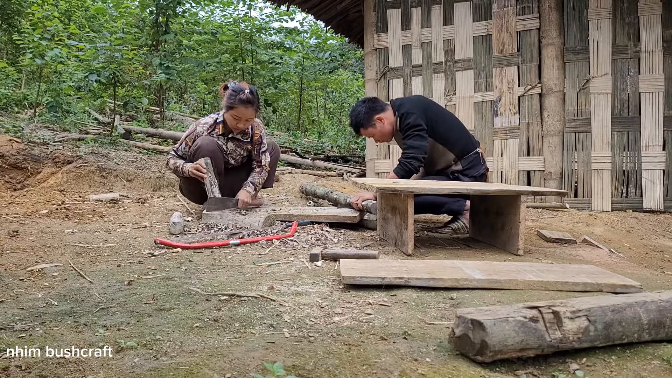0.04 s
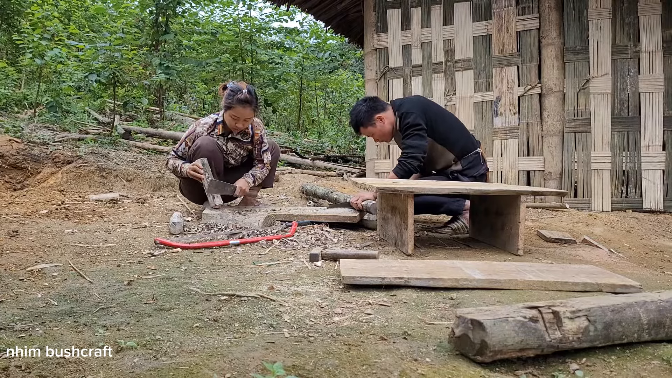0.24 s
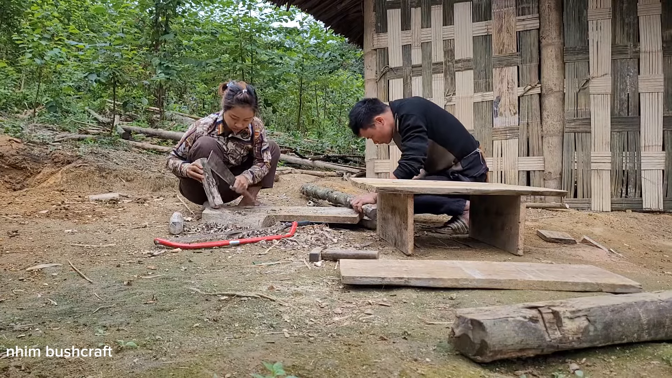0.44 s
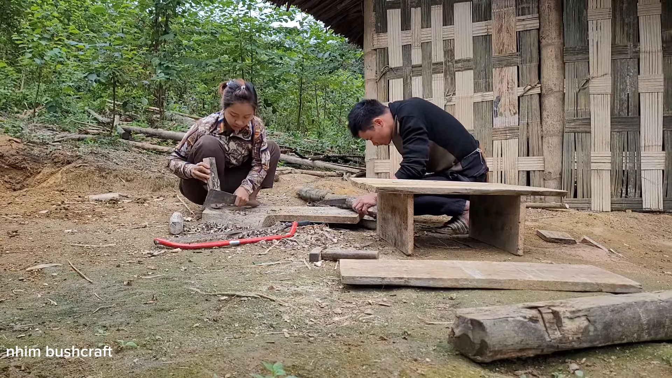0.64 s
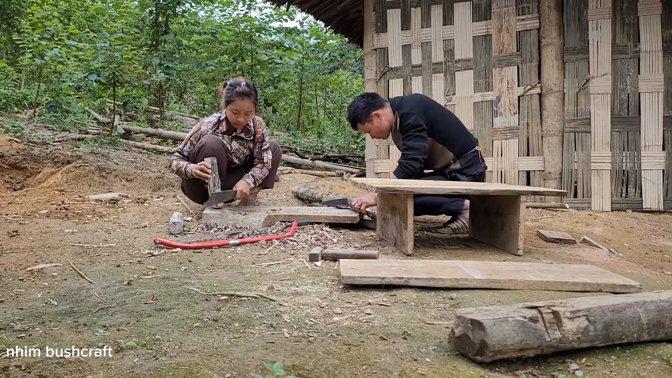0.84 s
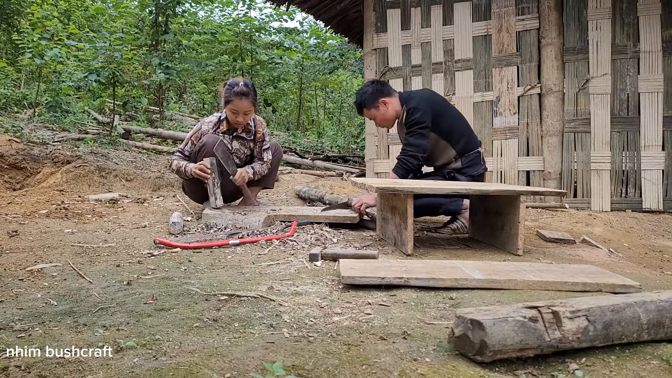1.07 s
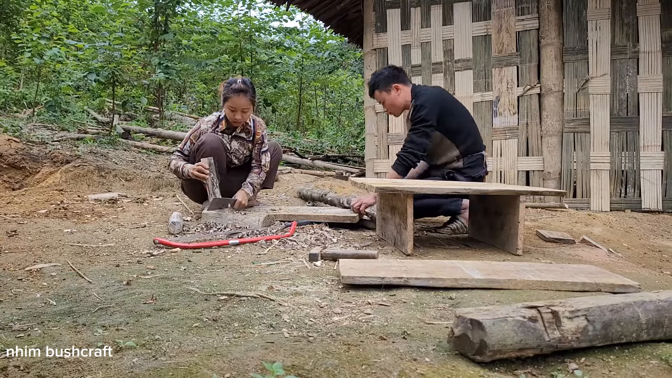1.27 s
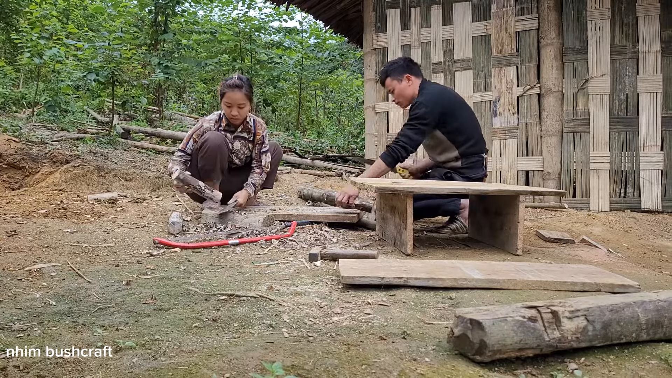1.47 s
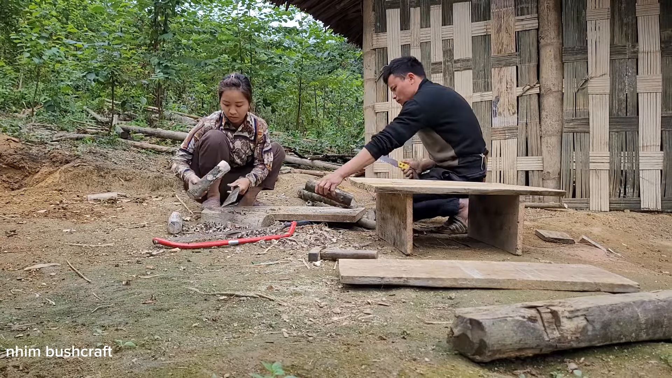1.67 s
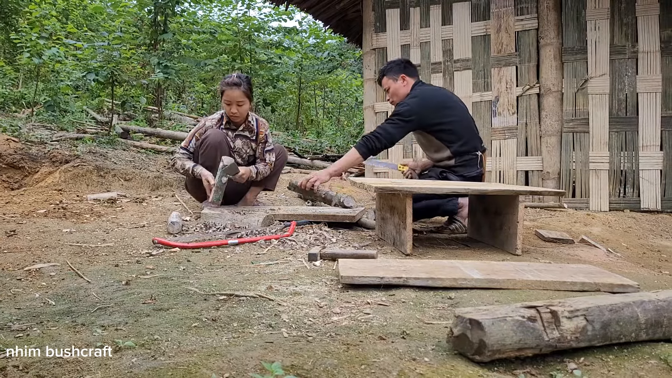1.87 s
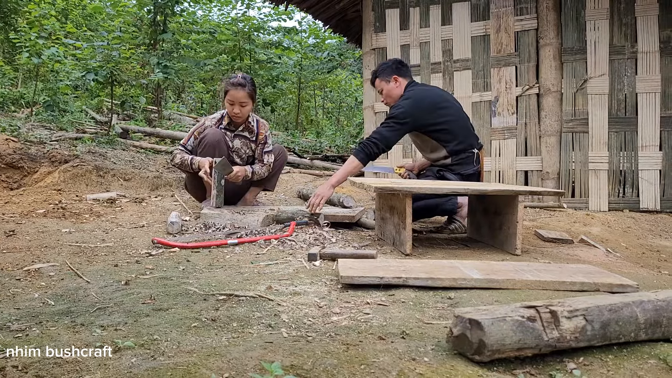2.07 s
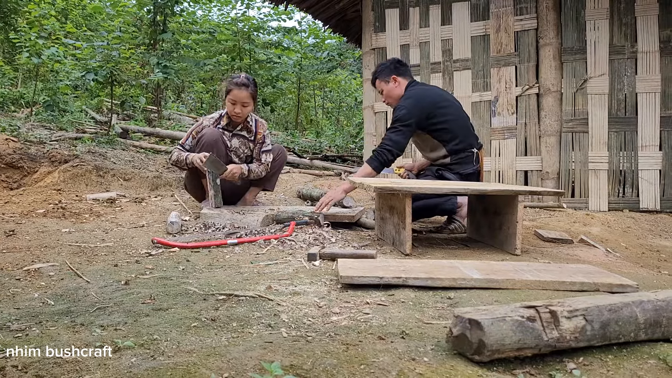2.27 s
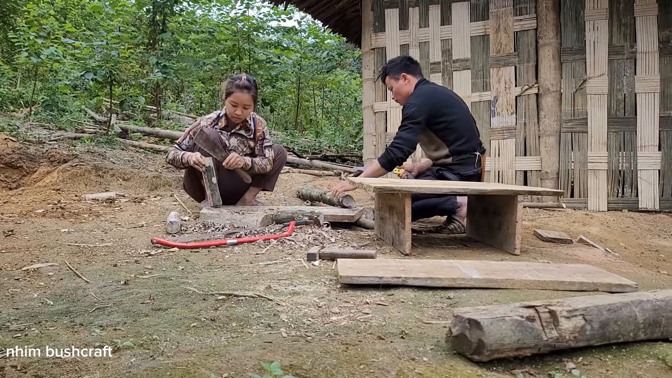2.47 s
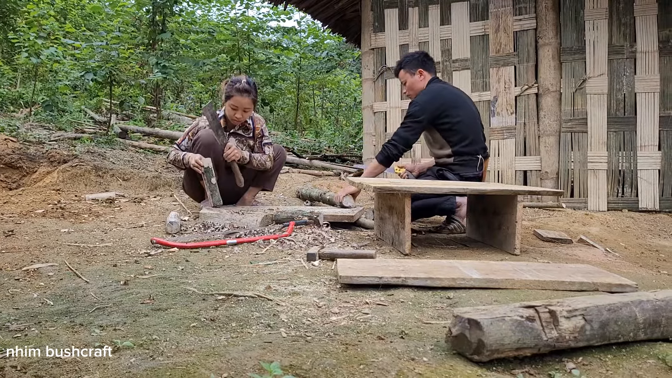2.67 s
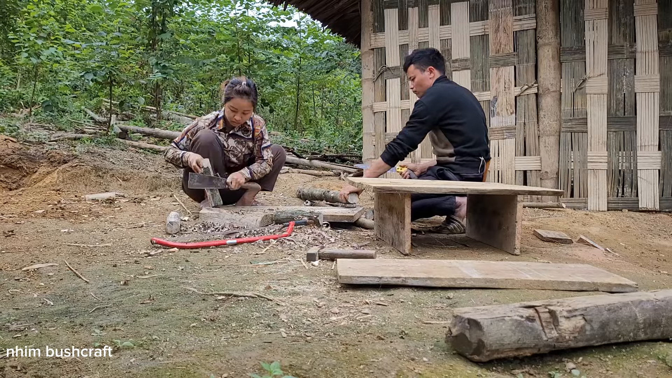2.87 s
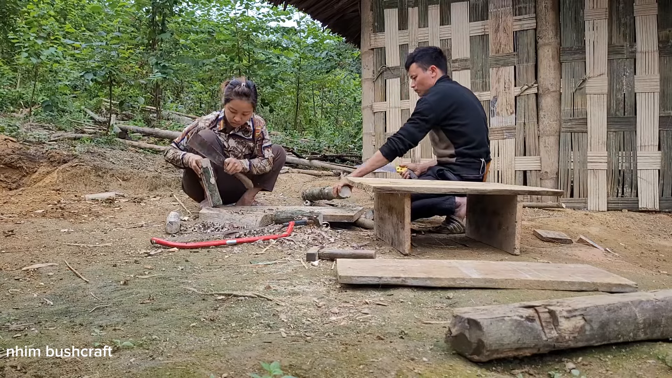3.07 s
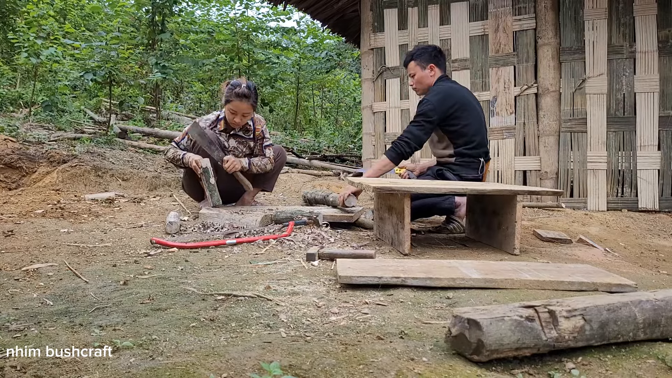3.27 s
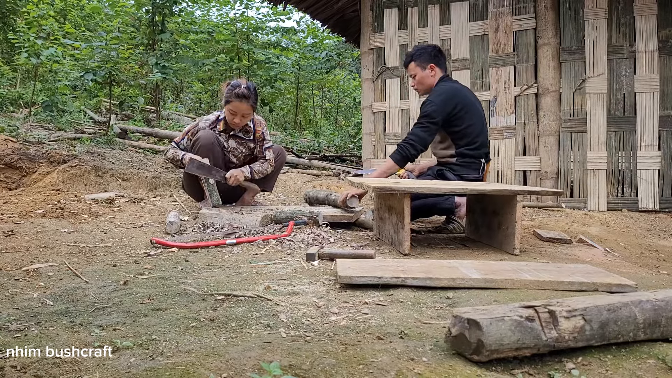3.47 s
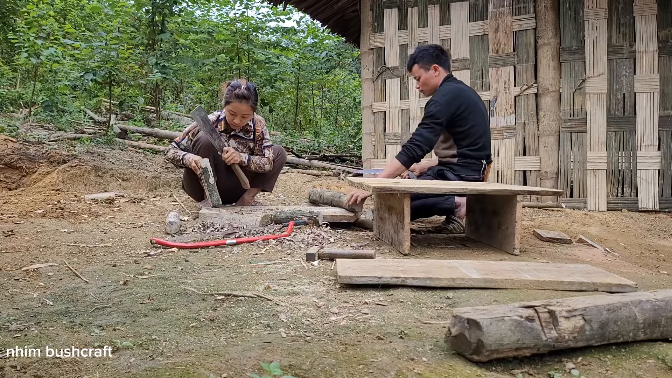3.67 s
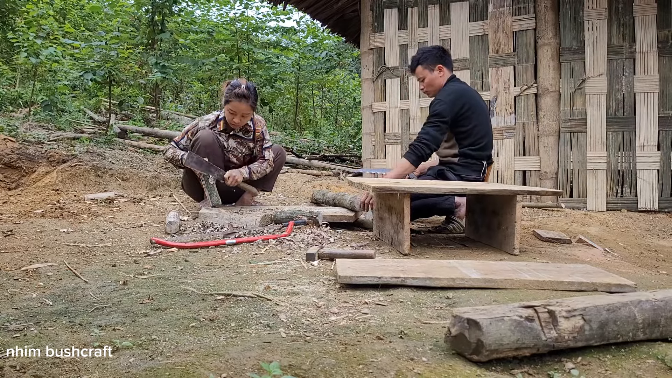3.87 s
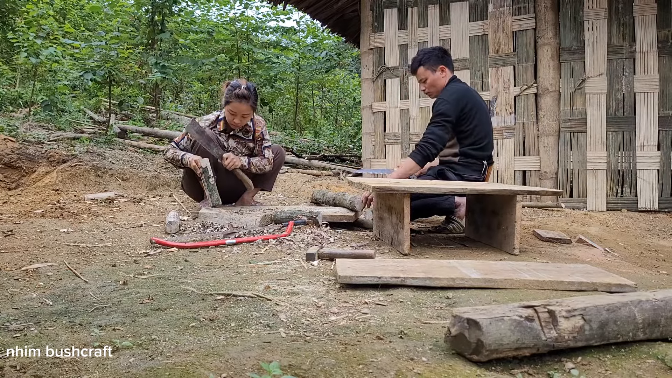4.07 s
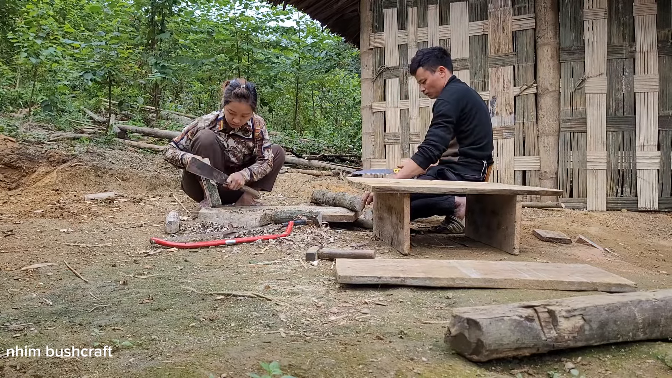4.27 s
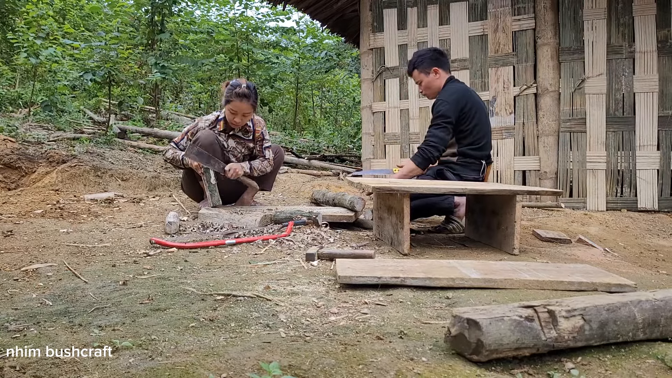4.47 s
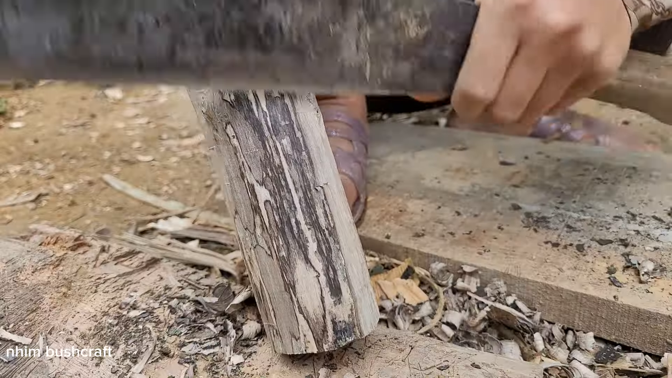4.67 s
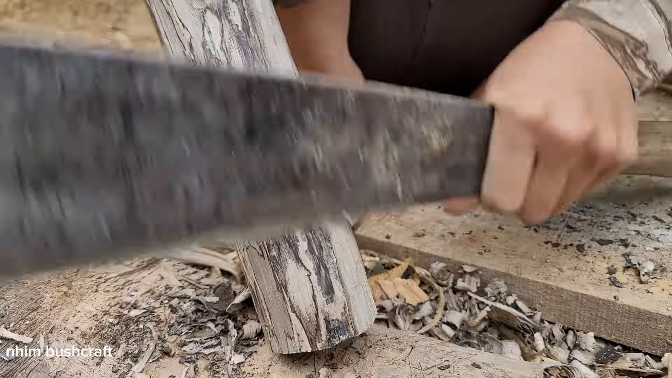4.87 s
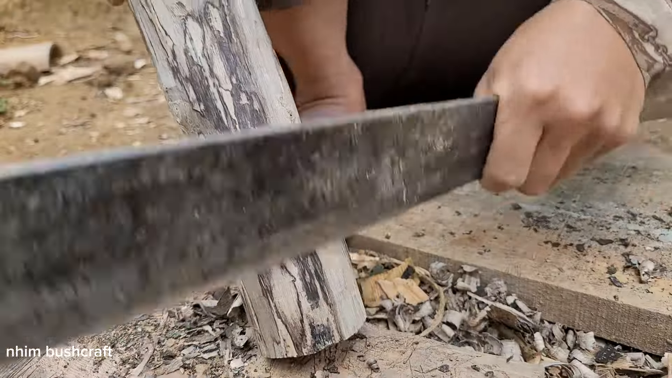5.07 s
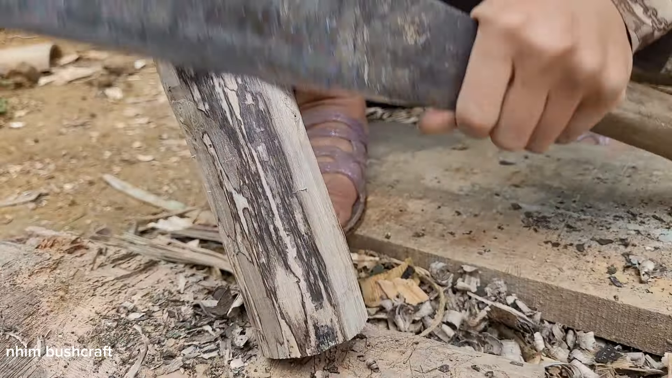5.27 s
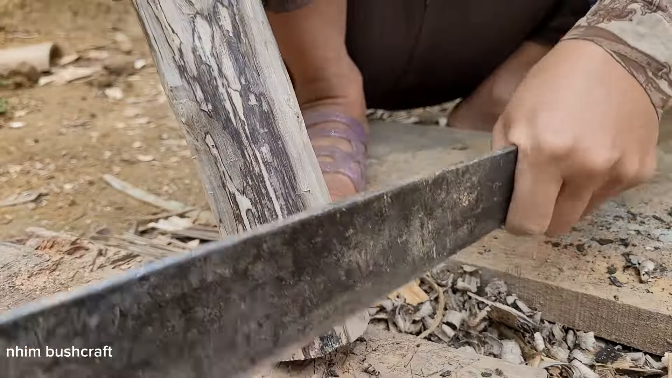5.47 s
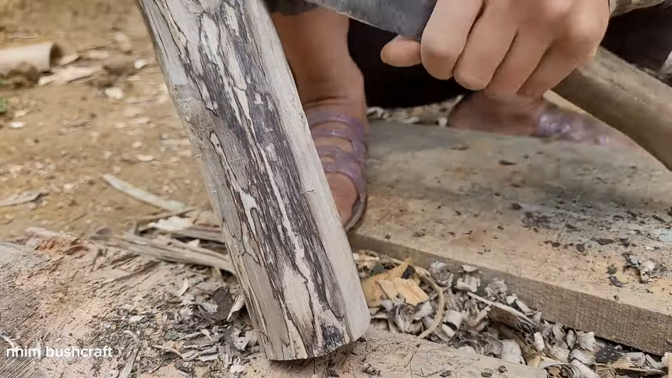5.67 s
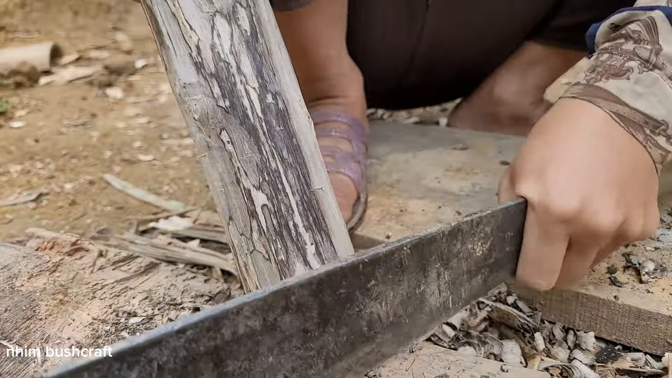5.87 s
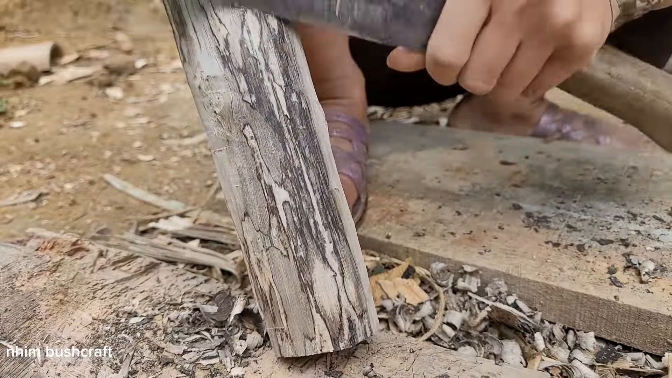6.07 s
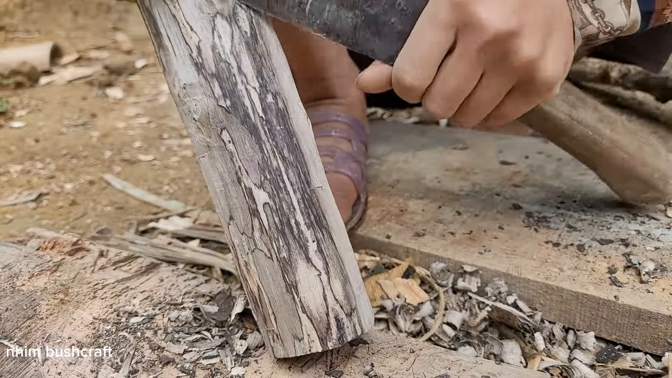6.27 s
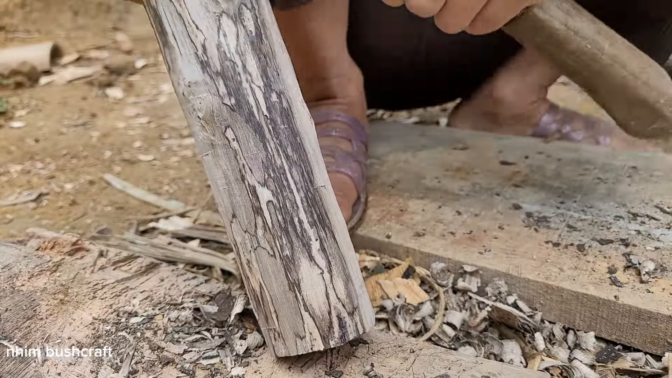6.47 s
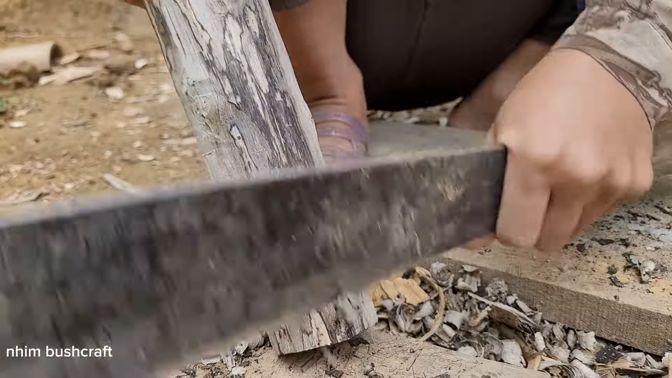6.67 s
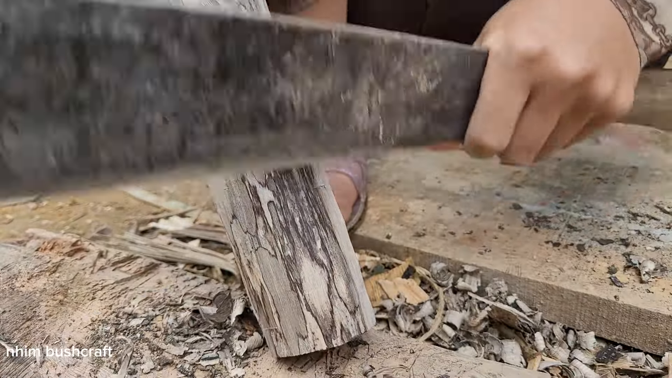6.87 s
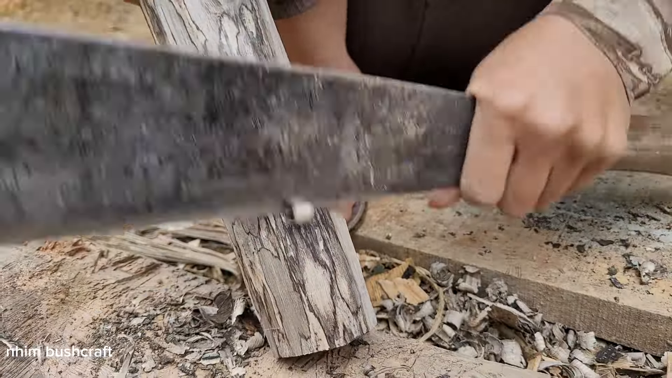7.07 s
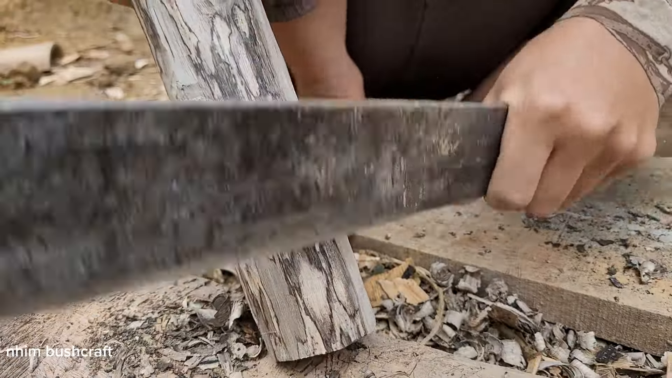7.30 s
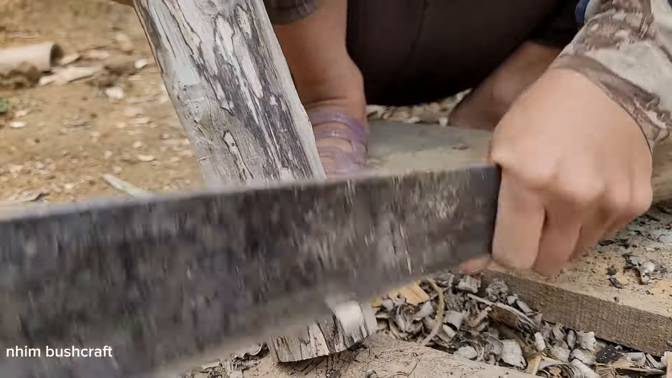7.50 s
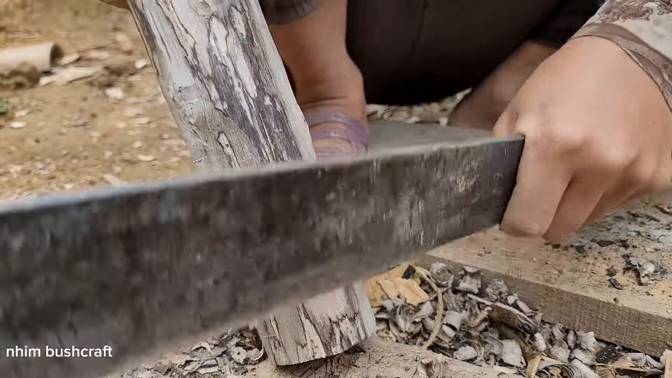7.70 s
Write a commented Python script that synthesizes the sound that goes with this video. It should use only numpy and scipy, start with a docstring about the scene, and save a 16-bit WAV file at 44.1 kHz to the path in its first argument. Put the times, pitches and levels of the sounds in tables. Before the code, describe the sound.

In a quiet leafy yard, heard from a few metres, a machete chops a stick on a block beside a short burst of hand sawing. The saw stops and lighter, scattered slicing strokes follow. After a tiny gap of silence the microphone is right by the blade: steady, loud blows with torn wood, steel hiss, hard knocks and low thuds, with sawing resumed alongside.

```python
"""Outdoors in a yard under trees, a machete shaves a stick that stands on a block.
Each stroke is torn noise with ringing steel and wood; most end in a knock pulse and a low thud.
Beside it a hand saw, noise through timber modes with rows of tooth pulses, rasps and judders;
it rests while the chopping is light. Leaves, faint birds and litter are shaped noise. All is heard
first from a few metres away, then, after a short silence, from close to the blade."""
import sys
import numpy as np
from scipy import signal
from scipy.fft import rfft, irfft, next_fast_len
from scipy.io import wavfile
from scipy.ndimage import uniform_filter1d

SR = 44100
rng = np.random.default_rng(int(sys.argv[2]) if len(sys.argv) > 2 else 0)


def generate_wav(sig):
    """Save sig (samples, or channels by samples) to the path in sys.argv[1] as 16-bit PCM at SR."""
    pcm = np.round(np.clip(np.atleast_2d(sig).T, -1, 1) * 32767).astype(np.int16)
    wavfile.write(sys.argv[1], SR, pcm)


N = 341334
AGE = np.arange(SR // 2) / SR  # time since the start of an event, s
TIME = np.arange(N) / SR


def amp(db):
    """Level law: decibels to amplitude gain."""
    return 10 ** (np.asarray(db) / 20)


def unit(x):
    """Power normalisation: scale to rms 1."""
    return x / np.sqrt(np.mean(x ** 2) + 1e-20)


def along(points, hz):
    """Logarithmic frequency scale: (f/Hz, value) points interpolated on it."""
    f, v = np.transpose(points)
    return np.interp(np.log(hz + 1), np.log(f + 1), v)


def fade(t60, t=AGE):
    """Exponential damping: 60 dB of decay in t60 seconds."""
    return np.exp(-np.log(1000) * t / t60)


def pan(db):
    """Interaural level difference: left and right gains that differ by db."""
    return unit(amp([[db / 2], [-db / 2]]))


def from_side(x, lead):
    """Time-of-arrival difference: the left channel leads the right by lead seconds."""
    size = next_fast_len(N + SR // 2)
    turn = np.pi * lead * np.fft.rfftfreq(size, 1 / SR)
    return irfft(rfft(x, size) * np.exp(1j * np.array([turn, -turn])), size)[:, :N]


def add(track, s, sound):
    """Superposition: mix a sound into a track at time s."""
    i = max(0, round(s * SR))
    part = track[..., i:i + sound.shape[-1]]
    part += sound[..., :part.shape[-1]]


# left-right likeness of diffuse noise: f/Hz, correlation
CORRELATION = [(100, 1), (500, 0.6), (1500, 0.47), (4000, 0.3), (12000, 0.018)]


def noise(spectrum, size=len(AGE)):
    """Spatial coherence: coloured stereo noise of rms 1, alike in the bass, unrelated in the treble."""
    hz = np.fft.rfftfreq(size, 1 / SR)
    turn = np.arccos(np.clip(along(CORRELATION, hz), -1, 1)) / 2
    spectra = rfft(rng.standard_normal((2, size))) * amp(along(spectrum, hz))
    mid, side = irfft(spectra * [np.cos(turn), np.sin(turn)], size)
    return unit(np.array([mid + side, mid - side]))


def grainy(depth_db, rate, size=len(AGE)):
    """Random modulation: an rms 1 gain with rate new random values a second, joined by straight lines."""
    knots = rng.standard_normal(size // 4)
    wander = np.interp(np.arange(size) * rate / SR, np.arange(len(knots)), knots)
    return unit(amp(depth_db * wander))


def resonate(x, modes, vary_db=0, detune=0):
    """Modal resonance: x excites damped modes whose strength and pitch vary with the point of contact."""
    ring = np.zeros((2, len(AGE)))
    for hz, db, t60 in modes:
        pitch = hz * (1 + detune * rng.normal())
        strength = amp(db + vary_db * rng.standard_normal((2, 1)))
        ring += strength * fade(t60) * np.sin(2 * np.pi * pitch * AGE)
    rung = signal.fftconvolve(x, ring, axes=1)[:, :x.shape[-1]]
    return unit(rung) * np.std(x)  # as strong overall as x


def patchy(x, depth_db, size, count):
    """Time-frequency modulation: random gain patches, size bins high and count frames long."""
    z = signal.stft(x, nperseg=1024)[2]
    field = rng.standard_normal(z.shape[1:])
    for _ in range(2):
        field = uniform_filter1d(uniform_filter1d(field, size, 0), count, 1)
    hz = np.fft.rfftfreq(1024, 1 / SR)
    depth = np.interp(hz, [3500, 7000], [depth_db, depth_db / 2])  # the treble is smoother
    gain = amp(depth[:, None] * unit(field))
    gain = gain / np.sqrt(np.mean(gain ** 2, axis=1, keepdims=True))
    return signal.istft(z * gain, nperseg=1024)[1][:, :N]


def puff(length, hz, width):
    """Band-limited noise: a soft swell around one frequency."""
    band = [(hz / (1 + 4 * width), -70), (hz / (1 + width), -8), (hz, 0),
            (hz * (1 + width), -8), (hz * (1 + 4 * width), -70)]
    return noise(band) * np.sin(np.pi * np.minimum(AGE / length, 1))


# the silence between the two positions: start t/s, end t/s
SILENCE = (4.63, 4.682)


def far(rows):
    """Listening distance: the events heard from a few metres away."""
    return [row for row in rows if row[0] < SILENCE[0]]


def near(rows):
    """Listening distance: the events heard from close to the blade."""
    return [row for row in rows if row[0] > SILENCE[0]]


# stirring leaves: f/Hz, relative spectral level/dB
LEAVES = [(20, -29), (60, -4), (130, -18.5), (220, -11.5), (420, -9), (500, -5.5), (580, -1.5),
          (720, -13.5), (1300, -11), (1900, -8), (3600, -8.5), (5000, -11), (12500, -15), (16000, -17)]
LEAVES_DB = -63.5  # before the drop close to the blade
# clearest distant birds: t/s, length/s, f/Hz, level/dB
BIRDS = [(1.698, 0.03, 1680, -56.5), (3.411, 0.028, 3730, -61), (3.464, .05, 2860, -58)]
# soft brushing and shifting of wood and clothes: t/s, length/s, f/Hz, relative width, level/dB before that drop
RUSTLES = [(.505, .017, 380, 0.85, -33.5), (1.33, 0.18, 770, 1, -64.5), (1.8, 0.0474, 445, 0.15, -63),
           (2.35, .23, 400, 0.34, -68.5), (2.36, .26, 12230, 0.24, -60.5), (3.184, 0.016, 1830, 0.51, -52),
           (3.69, 0.046, 580, 0.29, -59.5), (4.38, .07, 488, 0.21, -60)]


def forest(near_db=-3, call_db=-64, call_hz=2900, call_s=0.031, call_spread=0.17, count=12):
    """Filtered noise: leaves stir in patches over a faint hum, with soft bird calls and rustles."""
    size = next_fast_len(N)
    leaves = patchy(noise(LEAVES, size=size)[:, :N], depth_db=3.4, size=6, count=5)
    out = amp(LEAVES_DB) * leaves * grainy(1.5, 14, size=N) * pan(-2.8)
    faint_calls = []
    for when, high in rng.random((count, 2)):
        pitch = call_hz * np.exp(call_spread * (2 * high - 1))
        faint_calls.append((when * N / SR, call_s, pitch, call_db))
    for s, length, hz, db in BIRDS + faint_calls:
        add(out, s, amp(db) * puff(length, hz, width=0.12))
    for s, length, hz, width, db in RUSTLES:
        add(out, s, amp(db) * puff(length, hz, width))
    hum_band = [(480, -82.5), (560, -15), (580, -3.0), (600, -9.0), (700, -80)]
    hum = amp(-80) * noise(hum_band, size=size)[:, :N]
    return (out + hum) * amp(np.where(TIME > SILENCE[1], near_db, 0))


# sawn timber heard from afar: f/Hz, relative level/dB, t60/s
FAR_TIMBER = [(416, -11.5, 0.18), (605, -0.5, 0.069), (800, 10, 0.024), (1160, -2.5, 0.024),
              (1670, -11.5, 0.025), (2150, -4.5, 0.041), (2630, -4, 0.022)]
# sawn timber heard from close by: f/Hz, relative level/dB, t60/s
NEAR_TIMBER = [(415, -8, .025), (576, 1, .08), (1000, -2, .06), (1240, -15, .04), (1940, -12, .04),
               (2590, -12, .03), (3070, -10, .03)]
# rasp of the teeth: f/Hz, relative spectral level/dB
RASP = [(35, -11), (80, -6), (200, 0), (500, -3), (900, 1.5), (1600, -2), (3000, -9.5), (4500, -82.5),
        (9000, -43.5)]
# bright hiss of the teeth: f/Hz, relative spectral level/dB
SAW_HISS = [(1500, 5), (3200, 7), (5000, 2.5), (9500, -1.5), (13500, 4), (16000, -1.5)]
# saw strokes: t/s, swell/s, fall/s, base rasp level/dB
STROKES = [(0, .046, .1, -38), (.17, .09, 0.087, -42.5), (.35, .082, 0.1, -42.5), (.48, .16, 0.044, -38.5),
           (4.79, 0.12, .06, -26), (5.24, 0.068, .11, -46), (5.41, 0.055, 0.47, -48.5), (5.8, .12, .1, -33),
           (6.072, 0.14, 0.079, -32), (6.38, .079, 0.11, -36.5), (6.6, 0.14, .22, -43.5),
           (7, .13, .15, -35.5), (7.26, .095, .19, -37), (7.54, .14, .072, -30.5)]
# teeth catching in a row: middle t/s, spread (standard deviation)/s, base level/dB, tooth rate f/Hz at the middle
JUDDERS = [(.612, 0.0098, -35.5, 204), (.657, 0.0048, -38, 266), (4.839, .012, -32, 281),
           (4.899, 0.0093, -18, 197), (5.92, 0.018, -35.5, 185), (6.205, 0.012, -49.5, 190),
           (7.653, 0.022, -24.5, 190)]
HISS_GROWS = 0.65  # dB of saw hiss for each dB of rasp
SLOWING_PER_S = 4  # relative loss of tooth rate while the saw catches


def saw(strokes, judders, timber, side_db, ring_db, rasp_db, hiss_db, grain_db,
        thrum_db, thrum_hz, teeth_db, hammer_db):
    """Forced vibration: teeth rasp louder with stroke speed and, catching in a row, hammer the timber."""
    rasp, hiss, teeth, thrum = np.zeros((4, 2, N))
    for s, swell, fall, db in strokes:
        speed = np.sin(np.pi * np.interp(AGE, [0, swell, swell + fall], [0, .5, 1]))
        effort = np.abs(speed) ** 1.78
        cutting = effort * grainy(grain_db, 420)
        add(rasp, s, amp(db) * cutting * noise(RASP))
        add(hiss, s, amp(hiss_db + HISS_GROWS * db) * cutting * noise(SAW_HISS))
        tooth_hz = thrum_hz * np.exp(-5 * (AGE - swell)) * grainy(1.2, 250)  # the teeth slow as they sink in
        phase = 2 * np.pi * np.cumsum(tooth_hz) / SR
        add(thrum, s, amp(db + thrum_db) * effort * np.sin(phase))
    for s, spread, db, rate in judders:
        t = AGE - AGE.mean()
        passed = np.cumsum(rate * np.exp(-SLOWING_PER_S * t) * grainy(.2, 200)) / SR  # teeth so far
        u = (passed % 1 - .5) / rate / .00055
        pulls = np.exp(-u ** 2)  # each tooth gives a short pull
        swelling = np.exp(-(t / spread) ** 2 / 2)
        add(teeth, s - AGE.mean(), amp(db) * unit(pulls.mean() - pulls) * swelling)
    bending = [mode for mode in timber if mode[0] < 1100]  # the hammering rings only the low modes
    ring = amp(ring_db) * pan(side_db) * resonate(rasp, timber)
    hammering = amp(hammer_db) * pan(side_db * 0.49) * resonate(teeth, bending)
    dust = patchy(amp(rasp_db) * rasp + pan(side_db * 0.9) * hiss, depth_db=4, size=4, count=6)
    return ring + hammering + dust + thrum + amp(teeth_db) * teeth


# decay of the scattered sound: f/Hz, t60/s
YARD_DECAY = [(100, 0.24), (600, 0.088), (3000, 0.12), (12000, 0.12)]


def yard(x):
    """Diffuse scattering: ground, hut wall and trees return a short tail of decaying noise."""
    hz, t, z = signal.stft(rng.standard_normal((2, SR // 3)), SR, nperseg=256)
    decay = fade(along(YARD_DECAY, hz)[:, None], t)
    tail = signal.istft(z * decay, SR, nperseg=256)[1]
    tail = tail * np.minimum(np.arange(tail.shape[1]) / SR / 0.027, 1)  # builds up over 27 ms
    return signal.fftconvolve(x, tail / np.linalg.norm(tail[0]), axes=1)[:, :N]


# hiss of the steel edge: f/Hz, relative spectral level/dB
STEEL_HISS = [(1200, -34.5), (2800, -1), (4000, 1), (6500, -2), (8200, 1.5), (9500, -6), (12000, -2),
              (16000, -9.5)]
# crunch of torn wood: f/Hz, relative spectral level/dB
CRUNCH = [(25, -59.5), (60, -4), (130, -1.5), (300, -2.5), (700, -4.5), (1500, -4), (2200, -7),
          (3200, -3.5), (4500, -18.5), (12000, -41)]
# modes of the steel blade: f/Hz, relative level/dB, t60/s
BLADE = [(3050, -4, .04), (4645, -9, .06), (5134, -2, .05), (5895, -2, .06), (7015, 1, .07),
         (7130, -3, .05), (8170, 0, .06), (9390, -7, .08), (10665, -4, .06), (12200, -6, .04),
         (15230, -1, .05)]
# modes of the splitting stick, bright and short: f/Hz, relative level/dB, t60/s
SPLINTER = [(728, 1, 0.11), (1316, -9, 0.0083), (1980, -9, 0.022), (2030, 7, 0.043), (2550, -4.5, 0.022),
            (2610, 1.5, 0.043), (2985, 3.5, 0.03)]
# the blade bites, travels down the stick and lands (base levels): t/s, rise/s, travel/s,
# steel hiss level/dB, wood crunch level/dB, knock level/dB, knock f/Hz, thud level/dB
CHOPS = [(.012, 0.0035, 0.028, -28.5, -23.5, -17.5, 700, -28),
         (.524, 0.0022, 0.006, -36, -29.5, -42, 1100, -25.5),
         (.927, 0.0014, .0025, -56.5, -40, -23, 780, -51.5),
         (1.2013, .003, 0.013, -30.5, -25.5, -10.5, 1150, -25),
         (2.011, 0.003, 0.022, -34, -30.5, -48, 1100, -39),
         (2.819, 0.0084, 0.041, -42, -40.5, -53, 1200, -46),
         (3.192, 0.015, 0.027, -58.5, -45, -53, 1100, -39),
         (3.32, 0.0068, 0.044, -39.5, -39, -51, 1000, -36),
         (3.803, 0.0023, 0.029, -36.5, -34, -56, 1100, -54.5),
         (4.261, 0.009, 0.018, -35, -32.5, -43, 800, -36),
         (4.862, 0.038, .0664, -28.5, -34, -11, 670, -12.5),
         (5.329, 0.0179, .0405, -19.5, -40, -16, 660, -14), (5.79, .009, 0.032, -22, -33, -14, 630, -15),
         (6.663, 0.029, 0.059, -33, -39, -17, 620, -17.5),
         (7.078, .004, 0.078, -25.5, -20.5, -15, 650, -8.5),
         (7.515, 0.0034, .043, -21.5, -17, -18, 620, -12)]
# the edge only grazes the stick (base levels): t/s, rise/s, t60/s, steel hiss level/dB, wood crunch level/dB
GRAZES = [(.412, 0.031, 0.1, -36, -31), (1.918, .005, 0.145, -61.5, -53.5),
          (2.89, 0.023, 0.112, -52, -60.5), (4.682, 0.0027, 0.2, -56.5, -41.5),
          (4.745, 0.0057, 0.24, -57, -51), (5.0045, 0.0018, 0.26, -50, -59),
          (5.062, 0.0029, 0.047, -47.5, -47), (5.196, 0.0022, 0.05, -48.5, -32.5),
          (5.727, 0.022, 0.37, -41.5, -41.5), (5.935, .03, 0.095, -43, -55.5),
          (6.04, 0.018, .2, -50.5, -47), (6.613, .004, 0.12, -32, -28.5), (7.156, .002, 0.02, -22.5, -39)]


def slices(chops, grazes, side_db, ring_db, grain_db, hiss_db, crunch_db, splinter_db, body_db, body_hz,
           blade_side_db, tear_t60, tear_grows, grain_rate=1100):
    """Fracture noise: torn fibres crunch and excite stick and blade modes, differently at each stroke."""
    out = np.zeros((2, N))
    body_band = [(body_hz / 4, -35), (body_hz * .7, -3), (body_hz * 1.35, 0), (body_hz * 3, -30)]
    cuts = []
    for s, rise, travel, steel_db, wood_db, *_ in chops:
        cuts.append((s, rise, tear_t60 + tear_grows * travel, steel_db, wood_db))  # longer way, longer tear
    for s, rise, t60, steel_db, wood_db in cuts + grazes:
        bite = np.minimum(AGE / rise, 1) * fade(t60, np.maximum(AGE - rise, 0))
        tearing = bite * grainy(grain_db, grain_rate)
        steel = amp(steel_db + 2.5) * pan(side_db * 2.1) * tearing * noise(STEEL_HISS)
        wood = amp(wood_db + 2.0) * pan(side_db) * tearing * noise(CRUNCH)
        body = amp(wood_db + body_db) * tearing * noise(body_band)
        singing = pan(blade_side_db) * resonate(steel, BLADE, vary_db=4, detune=.003)
        splitting = resonate(wood, SPLINTER, vary_db=6.0, detune=0.058)
        of_wood = body + amp(crunch_db) * wood + amp(splinter_db) * splitting
        of_steel = amp(hiss_db) * steel + amp(ring_db) * singing
        add(out, s, of_wood + of_steel)
    return out


def knocks(chops, low_ratio, high_ratio, push_db, crack_db, side_db, clatter_t60=0.042, crack_t60=0.037,
           echo_db=-11, echo_delay=.0037):
    """Impact: a stiff push of the blade on the block and its echo off the ground, a crack and a damped clatter."""
    out = np.zeros((2, N))
    for s, _, travel, _, _, db, hz, _ in chops:
        landing = s + travel
        u = np.pi * hz * (AGE - .0012)
        push = amp(db + push_db) * (1 - 2 * u ** 2) * np.exp(-u ** 2)
        low_hz, high_hz = low_ratio * hz, high_ratio * hz  # the clatter spreads around the pitch of the knock
        band = [(low_hz / 8, -45), (low_hz / 2, -16), (low_hz, 0),
                (high_hz, -3), (high_hz * 2, -20), (high_hz * 8, -42)]
        clatter = noise(band) * fade(clatter_t60) * np.minimum(AGE / 0.0016, 1)
        crack = noise(STEEL_HISS) * fade(crack_t60)
        add(out, landing, pan(side_db) * (push + amp(db + 3.5) * clatter))
        add(out, landing, amp(db + crack_db) * pan(4.5) * crack)
        add(out, landing + echo_delay, -amp(echo_db) * push)
    return out


THUD_DELAY_S = .002  # the block gives way just after the knock


def thuds(hz=108, swell=0.0074, settle_db=-15):
    """Mass on a spring: the block bounces once or twice on the soil, then settles with a dull rumble."""
    out = np.zeros((2, N))
    rumble = [(20, -12.0), (55, 3.0), (130, -2.5), (260, -11.5), (600, -28), (2000, -69)]
    for s, _, travel, *_, db in CHOPS:
        phase = 2 * np.pi * hz * AGE * (1 + 0.022 * rng.standard_normal())
        envelope = (AGE / swell * np.exp(1 - AGE / swell)) ** 3
        bounce = envelope * -np.sin(phase + np.array([[.2], [-.2]]))
        settle = fade(.14) * np.minimum(AGE / swell, 1) * noise(rumble)
        add(out, s + travel + THUD_DELAY_S, amp(db) * (bounce + amp(settle_db) * settle))
    return out


def litter(quietest_db=-56, range_db=8, hz=2500, length_s=.06, count=14):
    """Granular friction: dry leaves and chips stir softly now and then before the silence."""
    out = np.zeros((2, N))
    for when, size, high in rng.random((count, 3)):
        pitch = hz * 2 ** (high - .5)  # within half an octave of hz
        stir = puff(length_s, pitch, width=.4) * grainy(2.5, 500)
        add(out, when * SILENCE[0], amp(quietest_db + range_db * size) * stir)
    return out


# the blade grazed so that one note stands out: t/s, f/Hz, base level/dB
CHINKS = [(.526, 5130, -33), (4.745, 7030, -44), (5.007, 5900, -34), (5.96, 7000, -39), (7.092, 8170, -29)]


def chinks(t60=0.074, attack=0.0034):
    """Single-mode ringing: short notes of the steel, roughened by the wood that rubs it."""
    out = np.zeros((2, N))
    for s, hz, db in CHINKS:
        note = np.sin(2 * np.pi * hz * AGE) * grainy(1.6, 270)
        add(out, s, amp(db) * pan(3) * note * fade(t60) * np.minimum(AGE / attack, 1))
    return out


# the stick struck or set down: t/s, base ring level/dB, reference mode f/Hz, base dull bump level/dB
TAPS = [(.929, -31, 842, -44), (4.746, -46, 1440, -43), (4.774, -45, 1430, -48.5), (5.02, -34, 1442, -24),
        (5.199, -20.5, 1444, -38.5), (5.458, -24, 1500, -21.5), (5.638, -25.5, 1451, -34),
        (6.765, -26.5, 1485, -23), (7.238, -41, 1540, -26.5), (7.522, -27.5, 1862, -22.5)]
# modes of the stick: multiple of the reference f, relative level/dB, t60/s
STICK = [(0.998, 11, 0.04), (1.442, -7, 0.072), (1.83, -7, 0.04)]
# dull bump of its foot: f/Hz, relative spectral level/dB
BUMP = [(25, -48.5), (60, -32.5), (200, 1), (450, 6), (900, -3.5), (1500, -10), (2200, -13.5), (3500, -17),
        (6000, -27.5), (16000, -48.5)]
STICK_HZ, STICK_RING_DB = 1532, -9  # the close stick rings with each knock; level relative to the knock's


def taps(attack=0.0014, bump_t60=0.047, steel_db=-17, foot_db=-14):
    """Free vibration of a bar: the stick rings, its foot bumps and the touching blade tinkles."""
    out, steel = np.zeros((2, 2, N))
    jolts = []
    for s, _, travel, _, _, db, _, _ in near(CHOPS):
        jolts.append((s + travel + THUD_DELAY_S, db + STICK_RING_DB, STICK_HZ, db + foot_db))
    for s, db, hz, bump_db in TAPS + jolts:
        onset = 1 - np.exp(-AGE / attack)
        ring = np.zeros((2, len(AGE)))
        for multiple, level, t60 in STICK:
            strength = amp(level + rng.normal(0, 1.1, (2, 1)))
            ring += strength * fade(t60) * np.sin(2 * np.pi * hz * multiple * AGE)
        bump = amp(bump_db + 2) * noise(BUMP) * fade(bump_t60)
        add(out, s, onset * (amp(db) * ring + bump))
        add(steel, s, amp(db + steel_db) * noise(STEEL_HISS) * fade(0.066))
    return out + steel + resonate(steel, BLADE, vary_db=1.0, detune=0.0051)


# a tooth snags and snaps free during or between saw strokes: t/s, base level/dB
SNAGS = [(6.0194, -33.5), (6.0348, -27.5), (6.426, -32.5)]


def snags(t60=.025, attack=.001, side_db=-7):
    """Stick-slip release: a snagged tooth lets go with a bright tick."""
    out = np.zeros((2, N))
    for s, db in SNAGS:
        tick = noise(SAW_HISS) * fade(t60) * np.minimum(AGE / attack, 1)
        add(out, s, amp(db) * pan(side_db) * tick)
    return out


def scene():
    """Direct and scattered sound: chopping and sawing, wetter from afar than from close by."""
    far_cuts = slices(far(CHOPS), far(GRAZES), side_db=0.74, ring_db=-10, grain_db=3.0, hiss_db=-1.5,
                      crunch_db=-6.0, splinter_db=-5, body_db=-4, body_hz=1450, blade_side_db=1,
                      tear_t60=.055, tear_grows=1.6)
    near_cuts = slices(near(CHOPS), near(GRAZES), side_db=0.5, ring_db=-3, grain_db=4.5, hiss_db=-1,
                       crunch_db=-1, splinter_db=-6.5, body_db=-10, body_hz=2220, blade_side_db=8,
                       tear_t60=.03, tear_grows=1.05)
    far_knocks = knocks(far(CHOPS), low_ratio=.48, high_ratio=1.4, push_db=9.5, crack_db=-30.5, side_db=-2.3)
    near_knocks = knocks(near(CHOPS), low_ratio=.33, high_ratio=2.75, push_db=8.2, crack_db=-17, side_db=2.1)
    blows = far_cuts + near_cuts + far_knocks + near_knocks + thuds() + taps() + chinks()
    chopping = from_side(blows, lead=0.00012)
    far_saw = saw(far(STROKES), far(JUDDERS), FAR_TIMBER, side_db=2.0, ring_db=1.5, rasp_db=0.0,
                  hiss_db=-16.5, grain_db=3.5, thrum_db=-4.0, thrum_hz=358.4, teeth_db=-22, hammer_db=9.5)
    near_saw = saw(near(STROKES), near(JUDDERS), NEAR_TIMBER, side_db=-5.5, ring_db=0.5, rasp_db=-2,
                   hiss_db=-17.5, grain_db=2.5, thrum_db=-7.0, thrum_hz=173.5, teeth_db=-15.5, hammer_db=4.5)
    work = chopping + far_saw + from_side(near_saw + snags(), lead=-.00036)
    wet = amp(np.where(TIME < SILENCE[0], -15, -22))
    return work + yard(wet * work) + forest() + litter()


TOP_HZ = 16200  # nothing is kept from here up


def record(dry):
    """Band limiting: the short silence, a low cut, full-scale clipping, then a sharp treble limit."""
    live = (TIME < SILENCE[0]) | (TIME > SILENCE[1])
    low_cut = signal.butter(2, 45, "highpass", fs=SR, output="sos")
    heard = np.clip(signal.sosfilt(low_cut, dry * live), -1, 1)
    size = next_fast_len(N + SR // 2)
    passed = np.fft.rfftfreq(size, 1 / SR) < TOP_HZ
    return irfft(rfft(heard, size) * passed, size)[:, :N]


dry = scene()
out = record(dry)
generate_wav(out)
```